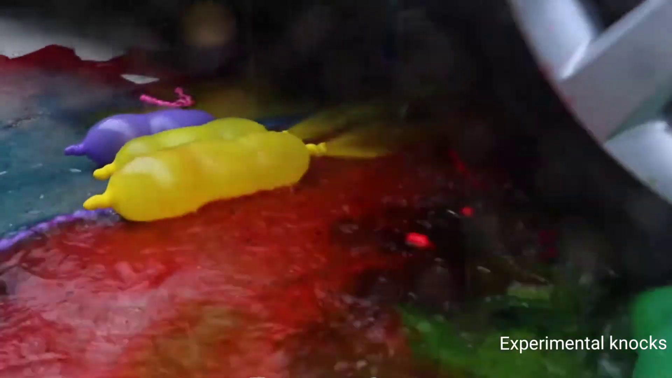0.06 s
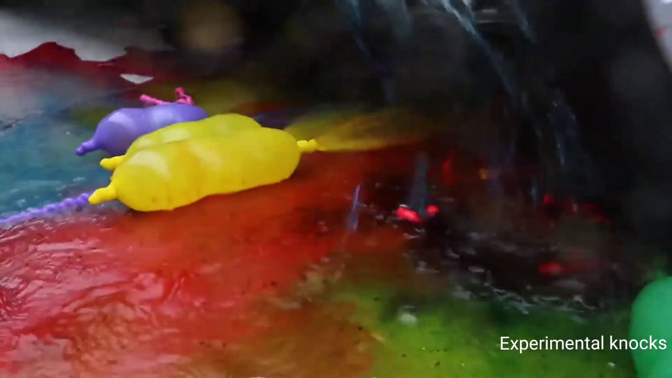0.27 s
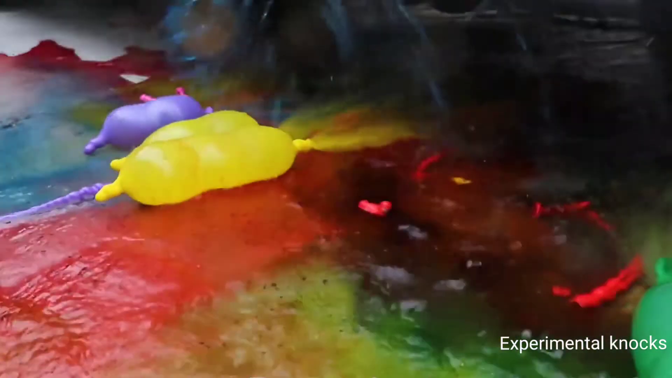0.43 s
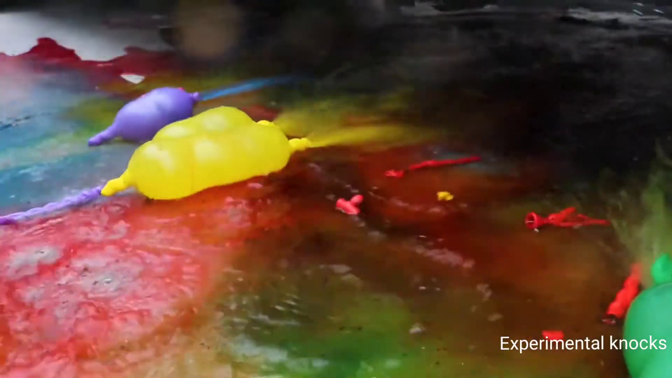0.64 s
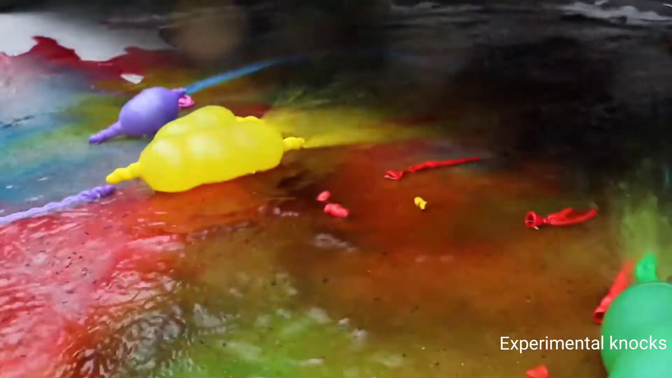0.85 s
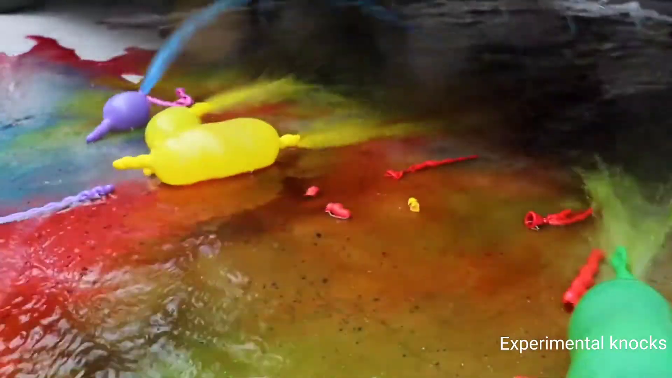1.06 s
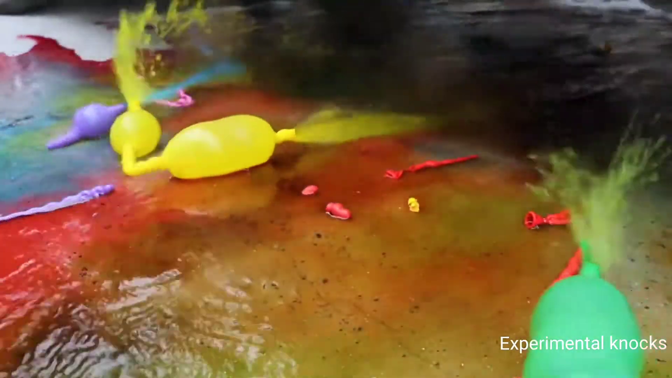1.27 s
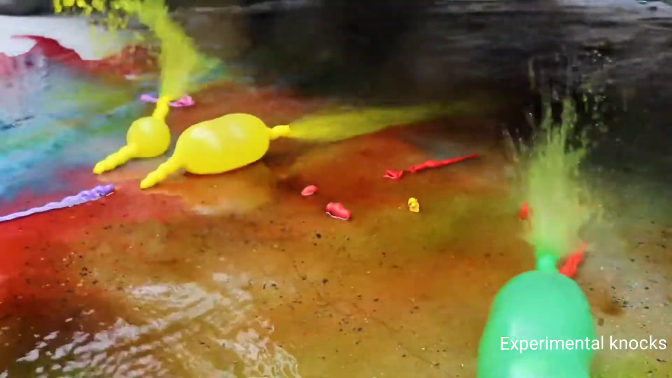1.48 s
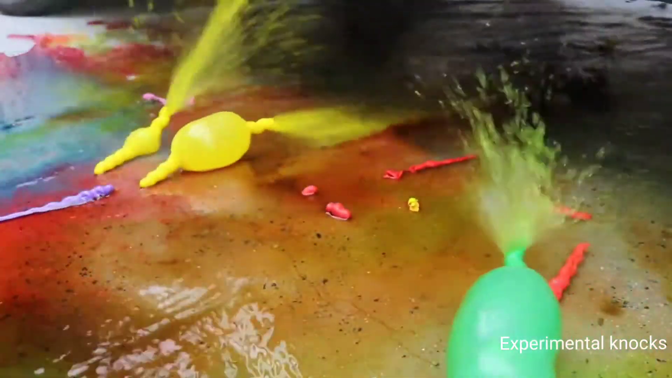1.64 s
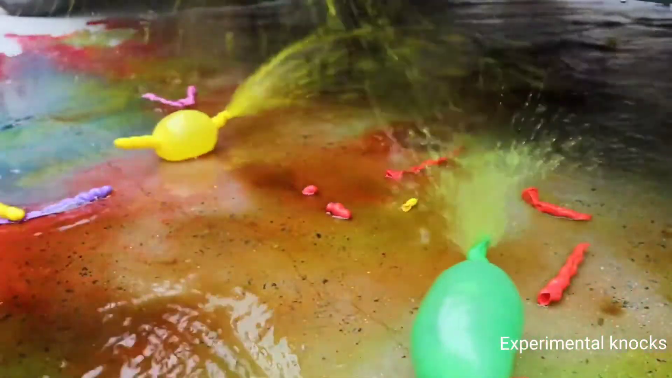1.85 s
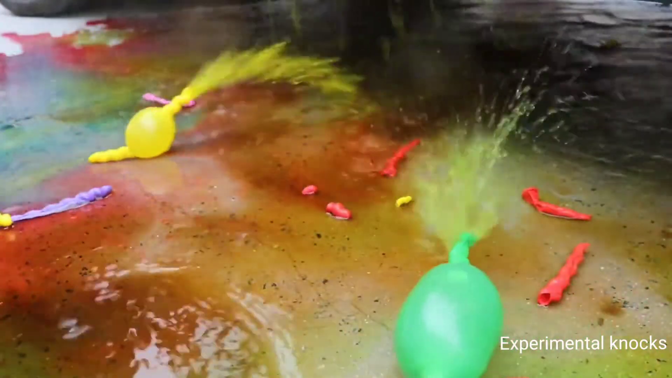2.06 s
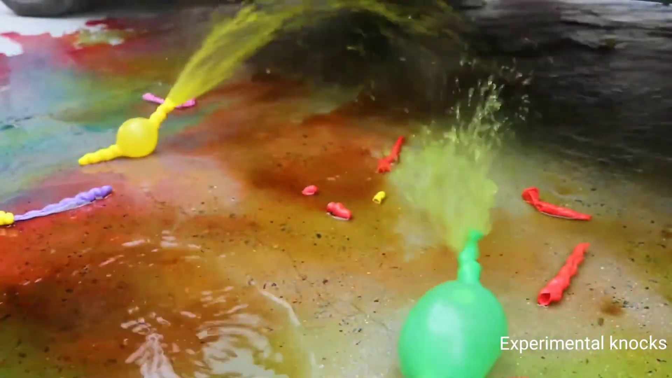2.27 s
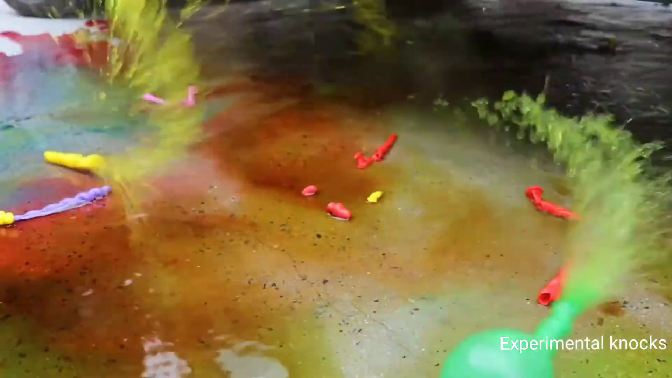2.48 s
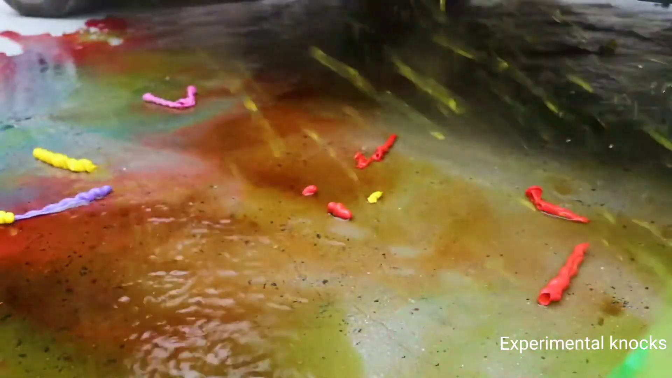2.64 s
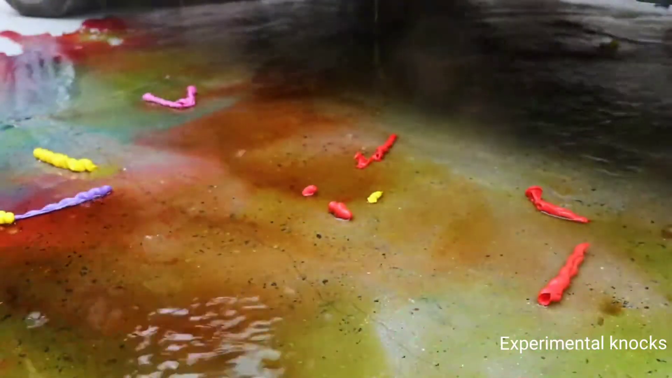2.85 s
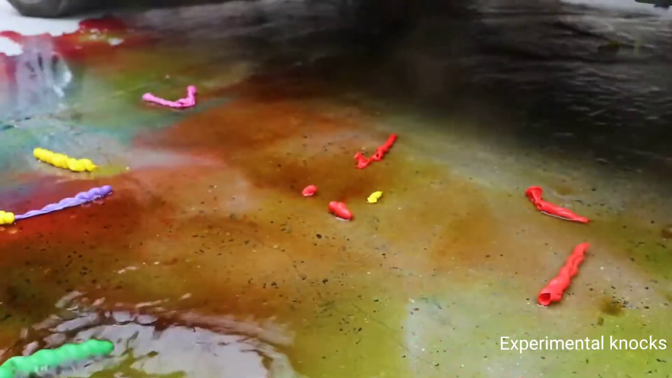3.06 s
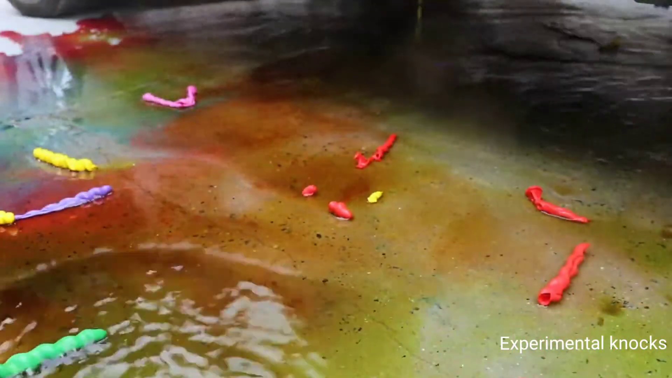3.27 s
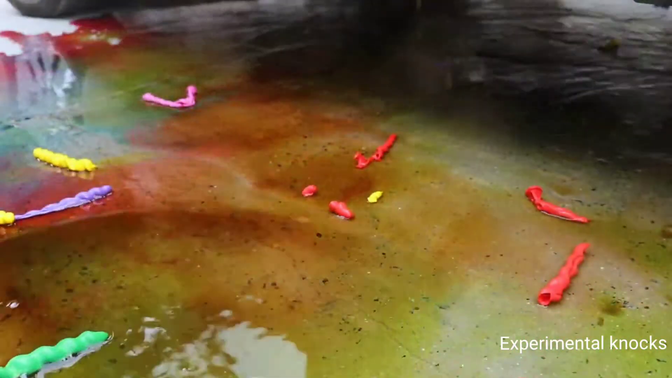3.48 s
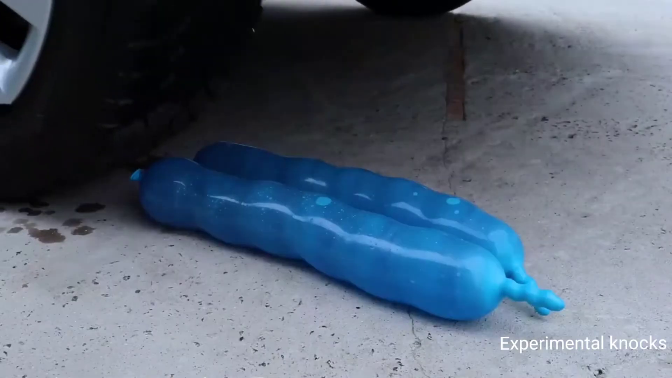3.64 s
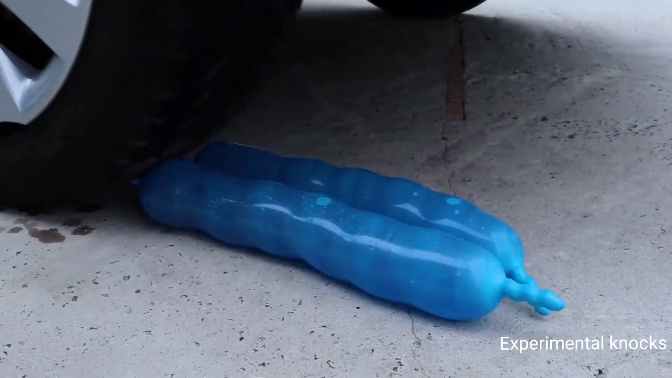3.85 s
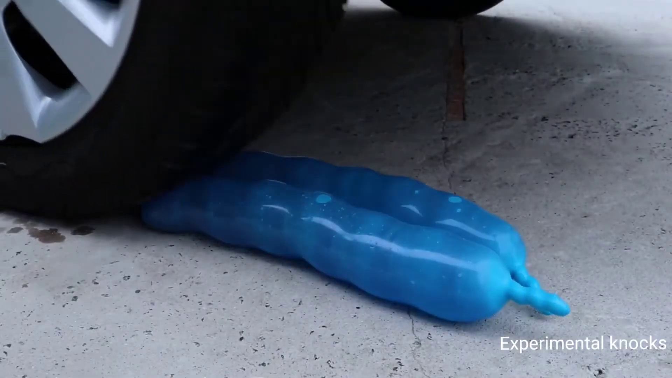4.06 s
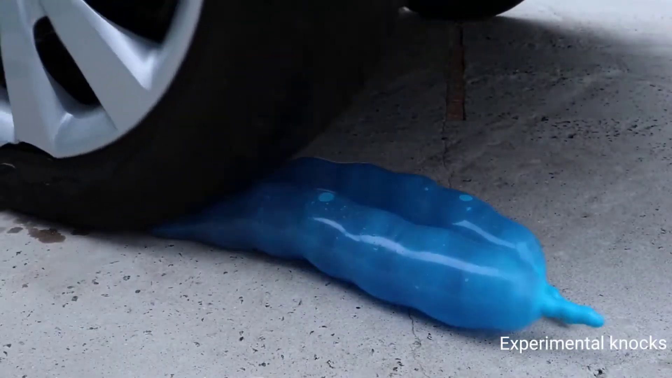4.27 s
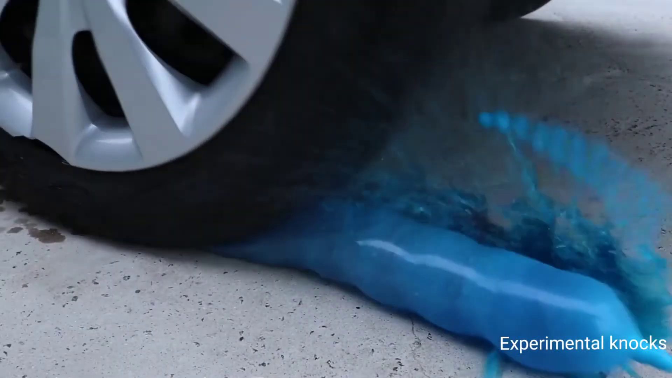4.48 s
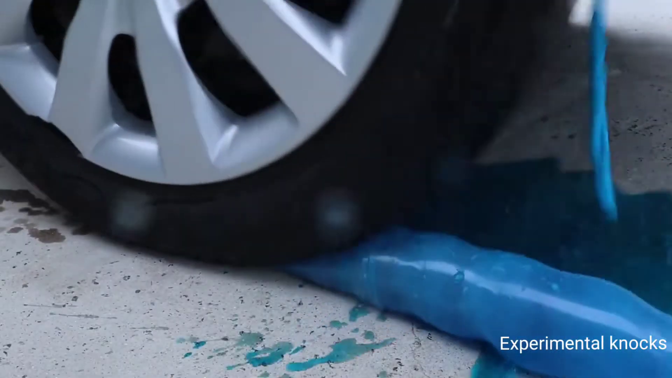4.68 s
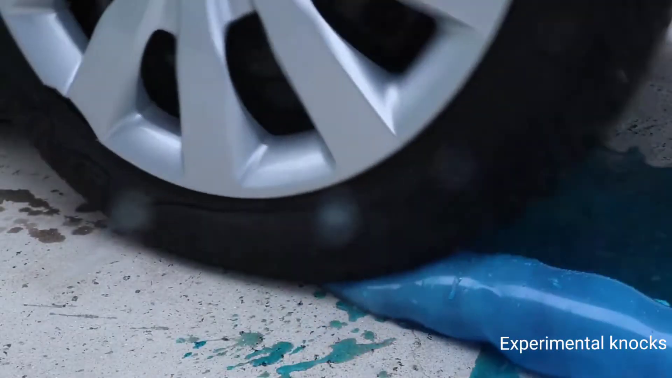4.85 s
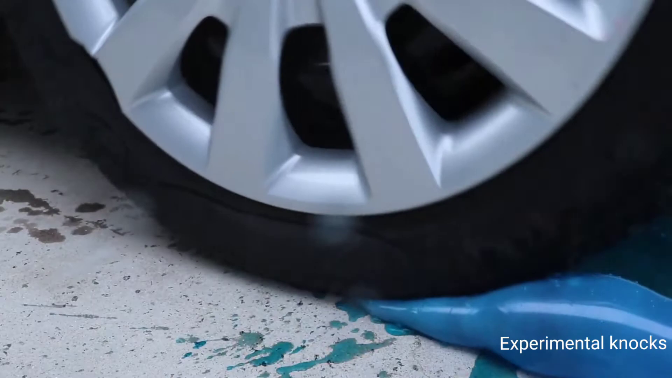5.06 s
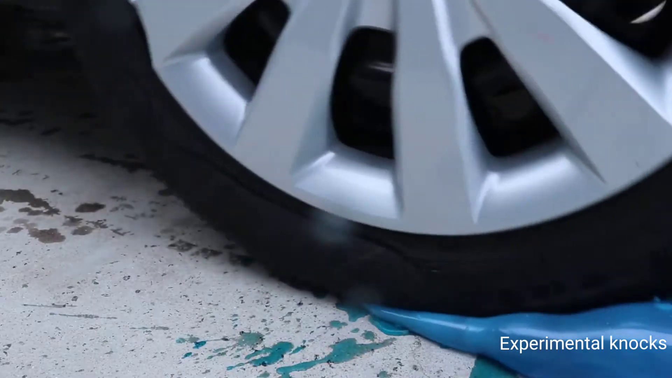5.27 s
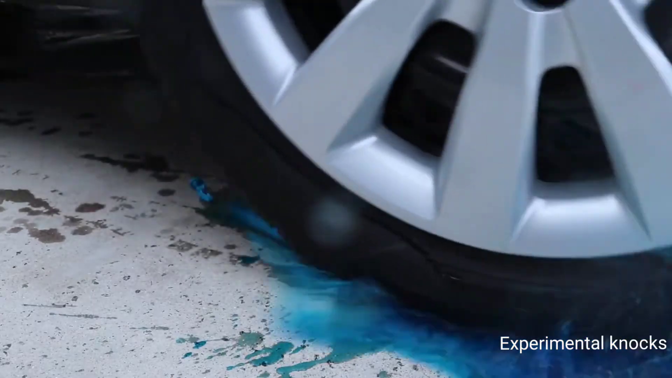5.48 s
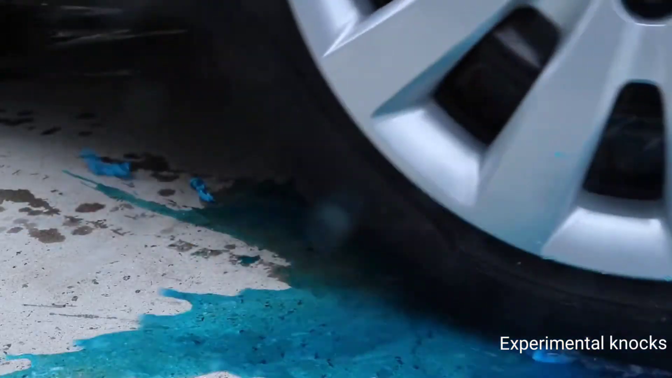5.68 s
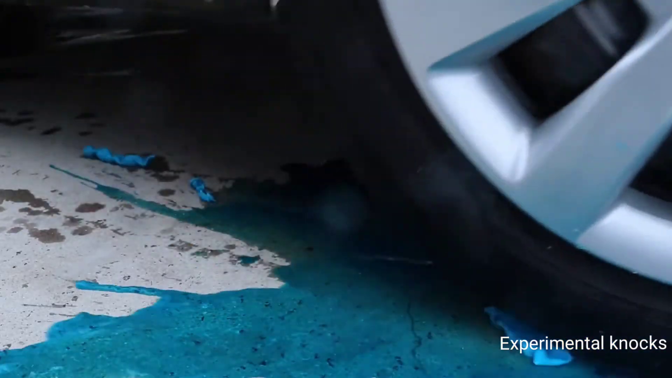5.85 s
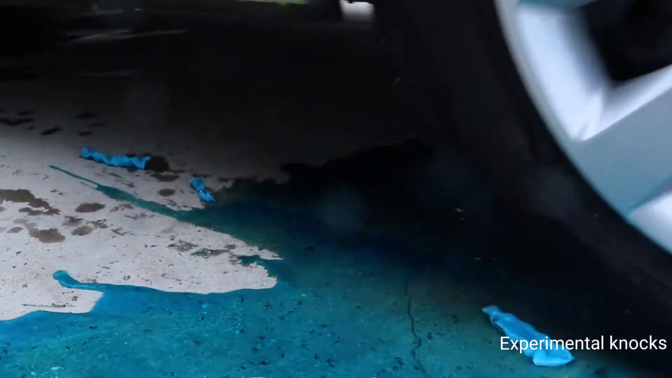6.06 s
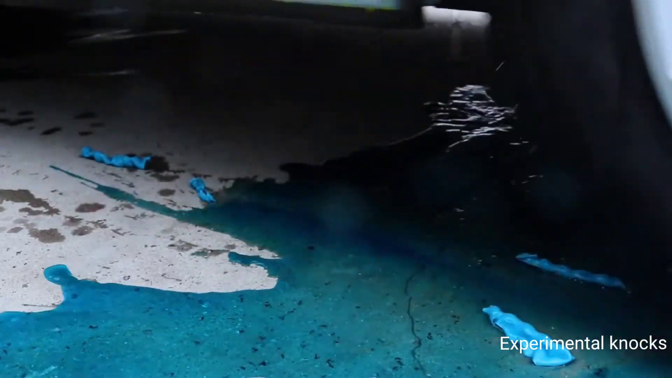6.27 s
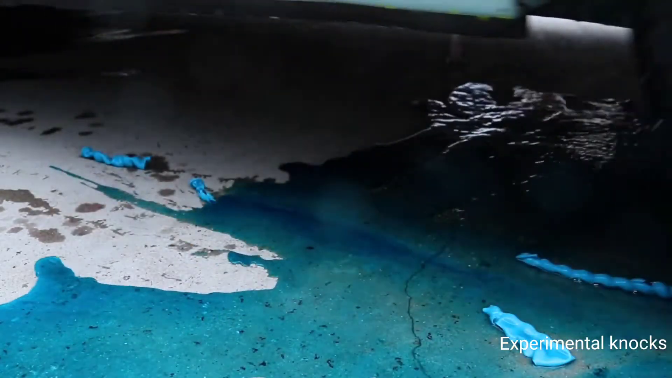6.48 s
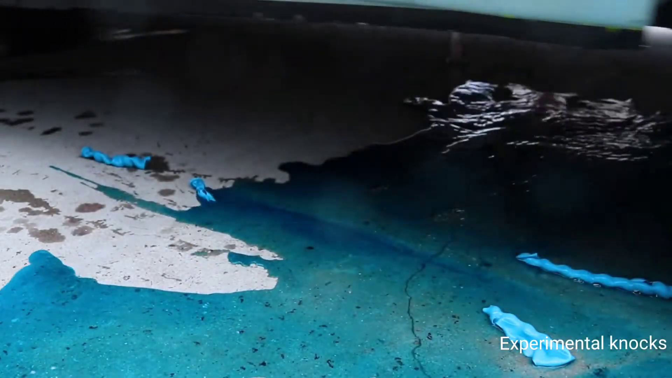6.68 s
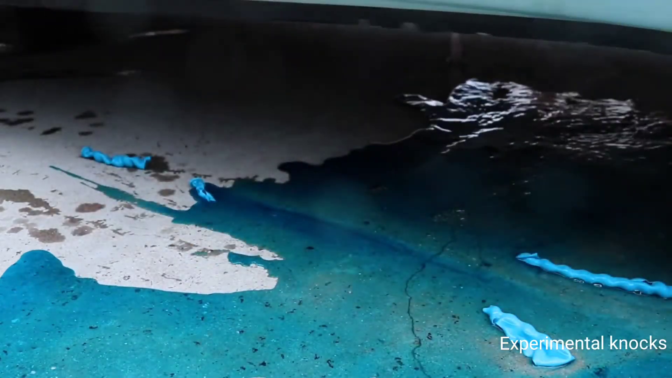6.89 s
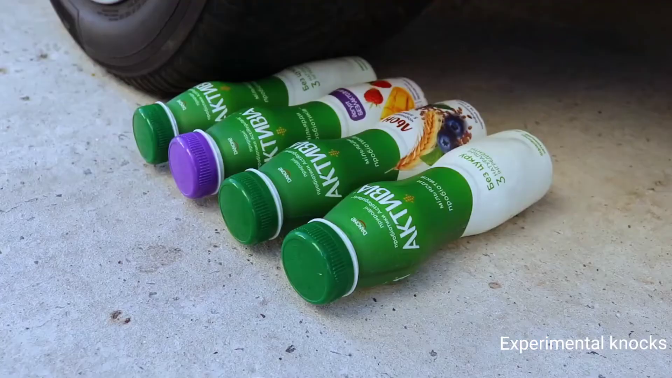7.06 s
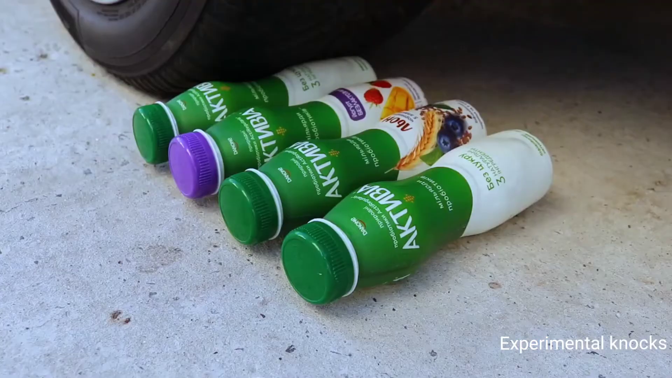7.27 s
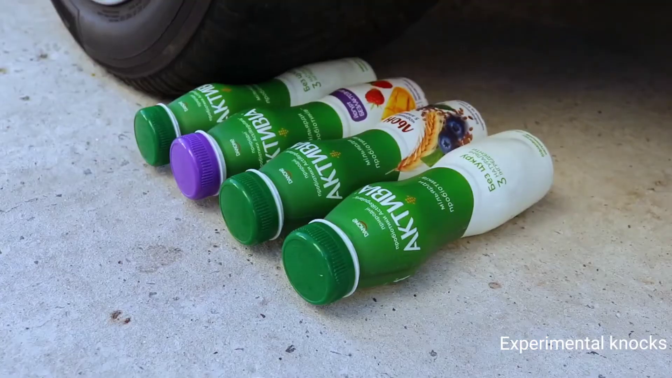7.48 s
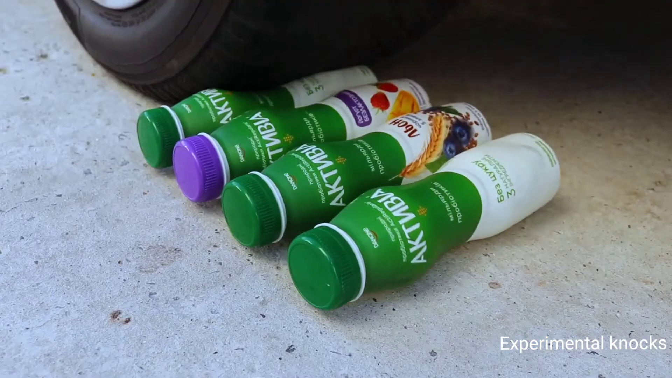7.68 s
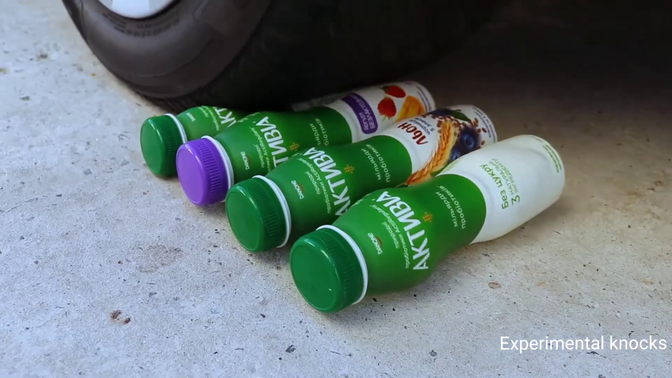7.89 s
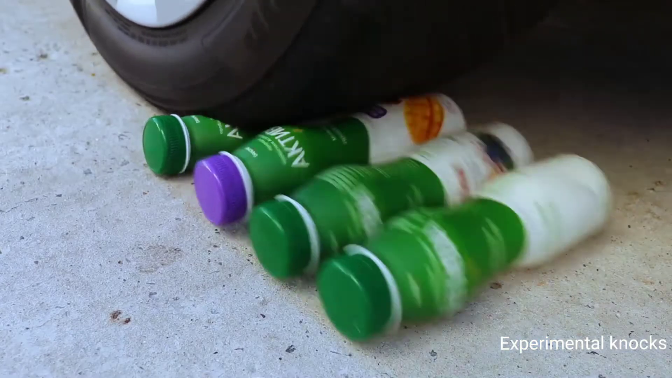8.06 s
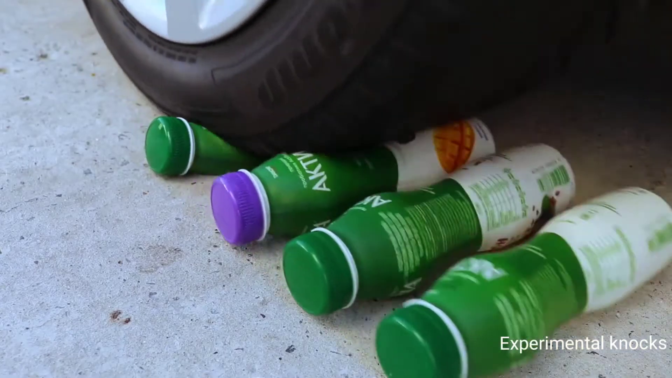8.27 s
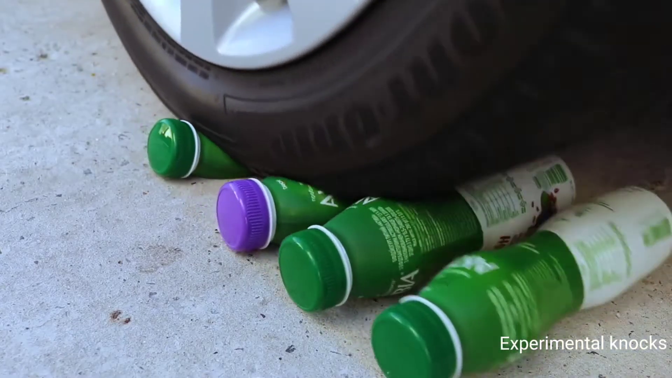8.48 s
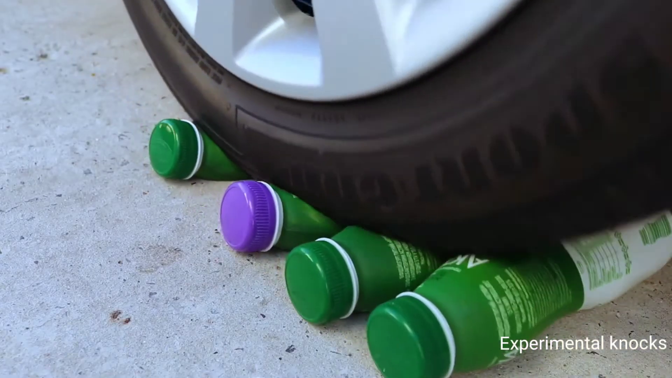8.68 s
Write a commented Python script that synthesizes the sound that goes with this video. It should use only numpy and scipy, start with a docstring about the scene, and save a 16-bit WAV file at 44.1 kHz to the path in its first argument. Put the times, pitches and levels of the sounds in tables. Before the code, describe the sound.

A close microphone outdoors beside a slowly rolling car wheel. Jets of water bubble and patter over a faint idle, fading to small drips. Then gliding high brake squeals, spitting water and gritty ticks accompany a sharp wet burst and a second, fuller, hollow one, followed by a thinning trickle and another squeal. Last, hollow plastic bottles crumple, cracking ever faster and louder with hissing contents until the abrupt end.

```python
"""A car creeps over things laid on concrete, close to the microphone, in three scenes, each over its own idling air.
First small water balloons squirt: ringing bubbles, drops and fluttering necks, with brief brake squeals.
Then water spits from under the tread, brakes sing as gliding tones, and two long balloons burst in torn noise
and ringing cavities. Last a row of plastic yoghurt bottles buckles in sharp panel snaps, crackles and hisses."""
import sys
import numpy as np
from scipy import signal
from scipy.fft import rfft, irfft, next_fast_len
from scipy.io import wavfile
from scipy.ndimage import uniform_filter1d, map_coordinates

SR = 44100
rng = np.random.default_rng(int(sys.argv[2]) if len(sys.argv) > 2 else 0)


def output_pcm(signal):
    """Save a mono or channel-first signal as 16-bit PCM at the path in sys.argv[1].

    Samples are clipped to [-1, 1] before scaling.
    """
    pcm = np.clip(np.atleast_2d(signal).T, -1, 1) * 32767
    wavfile.write(sys.argv[1], SR, np.round(pcm).astype(np.int16))


N = 384993

# water running out under the tread: time_s, flow_db (relative)
SPILL_FLOW = [(3.62, -79.5), (4.5, -65.5), (5.15, -54.5), (5.48, -63), (5.7, -59.5), (6, -64.5), (7.1, -73)]
# colour of water splashing: freq_hz, density_db (per Hz, relative)
SPLASH_SPECTRUM = [(60, -44.5), (250, -21.5), (450, -9.5), (700, -11.5), (1400, -7.5), (2200, -8),
                   (3500, -14.5), (8000, -29.5)]
# pressure of the tyre on the bottles, as a relative hiss level: time_s, level_db
BOTTLE_PRESSURE = [(7.58, -68), (7.78, -54.5), (7.93, -46.5), (8.27, -44), (8.44, -35.5), (8.73, -36)]
# bottle walls snapping through: start_s, panel_hz, panel_db, crack_db (relative)
WALL_SNAPS = [(7.71, 2130, -17.5, -31.5), (7.7115, 920, -14.5, -48), (7.763, 2850, -29.5, -48),
              (7.817, 830, -9, -38), (7.8517, 2210, -19.5, -47), (7.8532, 1430, -10.5, -51),
              (7.883, 920, -20, -45), (7.898, 730, -23.5, -38), (7.9099, 1550, -15.5, -48),
              (7.922, 1320, -25, -41), (7.9544, 2320, -43, -30.5), (7.9654, 1060, -24.5, -45),
              (8.0463, 1260, -14, -56), (8.0574, 1340, -16, -38), (8.0827, 1930, -25.5, -17.5),
              (8.0985, 2930, -22.5, -51), (8.2182, 940, -17.5, -53), (8.2553, 1960, -58, -24),
              (8.303, 1500, -18.5, -11.5), (8.3364, 850, -18, -24), (8.369, 1850, -28, -19),
              (8.3985, 2000, -23, -36), (8.4111, 890, -7.5, -15.5), (8.4418, 1740, -11.5, -35),
              (8.4556, 1140, -13, -44), (8.4761, 1350, -12, -45), (8.4846, 1380, -12.5, -48),
              (8.4911, 1240, -13, -48), (8.5222, 2720, -9, -15), (8.5953, 1600, -10.5, -34),
              (8.608, 2430, -16, -35), (8.6136, 2430, -10.5, -33), (8.624, 2140, -13, -44),
              (8.6352, 1000, -11.5, -36), (8.673, 2320, -19, -49), (8.68, 1030, -14.5, -47),
              (8.701, 1750, -12, -45)]
ROLLING_START_S, ROLLING_END_S = 3.75, 6.7  # the tyre rolls over wet concrete


def amp(db):
    """Decibels to gain."""
    return 10 ** (np.asarray(db) / 20)


def unit(x):
    """Scale to rms 1."""
    return x / np.sqrt(np.mean(x ** 2) + 1e-20)


def puff(x):
    """Give a short sound the energy of two milliseconds at rms 1."""
    return x / np.sqrt(np.sum(x ** 2) / (.002 * SR))


def along(points, hz):
    """Interpolate (Hz, value) points on a log frequency axis."""
    f, v = np.transpose(points)
    return np.interp(np.log(hz + 1), np.log(f + 1), v)


def curves(rows):
    """One value per sample for each column after the time."""
    s, *cols = np.transpose(rows)
    return [np.interp(np.arange(N) / SR, s, c) for c in cols]


def during(start_s, end_s):
    """A gate with soft edges."""
    t = np.arange(N) / SR
    return uniform_filter1d(((t >= start_s) & (t < end_s)) * 1., size=256)


def swell(s, length_s, edge_s):
    """An envelope that rises, holds and falls; a short one is a single arch."""
    edge_s = min(edge_s, length_s / 2)
    t = np.arange(int(length_s * SR)) / SR
    to_nearest_end_s = np.minimum(t, length_s - t)
    arch = np.sin(np.pi / 2 * np.minimum(to_nearest_end_s / edge_s, 1)) ** 2
    out = np.zeros(N)
    add(out, s, arch[max(-round(s * SR), 0):])  # drop what lies before time 0
    return out


def surges(rows):
    """Gains of a dull and a bright layer under a table of arched surges."""
    return sum(amp([[dull_db], [bright_db]]) * swell(s, length_s, length_s)
               for s, length_s, dull_db, bright_db in rows)


def wobble(rate_hz):
    """A smooth random curve, rate_hz knots a second."""
    steps = np.arange(0, N + 32, 32)
    knots = rng.standard_normal(int(N * rate_hz / SR) + 4)
    slow = map_coordinates(knots, [steps * rate_hz / SR])
    return np.interp(np.arange(N), steps, slow)


def filtered(x, response):
    """Multiply the spectrum of x by a response of frequency."""
    m = next_fast_len(len(x) + 8192)
    return irfft(rfft(x, m) * response(np.fft.rfftfreq(m, 1 / SR)), m)[:len(x)]


def highpass(x, corner_hz):
    """Small radiators give off little bass."""
    return signal.sosfilt(signal.butter(2, corner_hz, "high", fs=SR, output="sos"), x)


def coloured(x, spectrum):
    """x given a spectrum, at rms 1."""
    return unit(filtered(x, lambda hz: amp(along(spectrum, hz))))


def noise(spectrum, size=N):
    """Coloured noise of rms 1."""
    return coloured(rng.standard_normal(size), spectrum)


def band(centre_hz, q, size):
    """Noise in one resonance, rms 1."""
    def resonance(f):
        damping = 1j * f * centre_hz / q
        return 1j * f / (centre_hz ** 2 - f * f + damping)
    return unit(filtered(rng.standard_normal(size), resonance))


def fade(t, t60_s):
    """Exponential decay, 60 dB in t60_s."""
    return amp(-60 * t / t60_s)


def add(track, s, sound):
    """Mix a sound in at time s."""
    i = max(round(s * SR), 0)
    track[i:i + len(sound)] += sound[:max(N - i, 0)]


def drops(rows, rate_hz, centre_hz, cycles, spread_db, rise, size):
    """A random shower of damped little rings for as long as a curve lasts; rise bends their pitch up."""
    first_s, last_s = rows[0][0], rows[-1][0]
    chance = rng.random((int(rate_hz * (last_s - first_s)), 4))
    start = (SR * np.maximum(first_s + (last_s - first_s) * chance[:, :1], 0)).astype(int)
    hz = centre_hz * 3 ** (chance[:, 1:2] - chance[:, 2:3])
    strength = amp(-spread_db * np.log(chance[:, 3:] + .02))  # few strong, many weak
    k = np.arange(size)
    turns = hz * k / SR
    life = np.exp(-turns / cycles)
    rings = strength * life * np.sin(2 * np.pi * turns * (1 + rise * (1 - life)))
    return np.bincount((start + k).ravel(), rings.ravel(), minlength=N)[:N]


def shower(rows, grains, share, spectrum):
    """Grains on a smooth rush of the same colour, rms 1 while the curve lasts."""
    gate = during(rows[0][0], rows[-1][0])
    mix = share * unit(grains) + unit(gate * rng.standard_normal(N))
    return coloured(mix, spectrum) * np.sqrt(gate.mean())


def air():
    """Each scene has its own noise bed of idling engine and outdoor air; the second carries a thin whine."""
    # scene borders: first_s, second_s
    first_s, second_s = (3.605, 7.125)
    # bed colours: freq_hz, density_db (per Hz, relative)
    puddle_spectrum = [(15, -41), (25, -11), (64, 0), (140, -9.5), (253, -2.5), (359, -8), (919, -5),
                       (2700, -16.5), (3440, -55), (8580, -26), (15500, -25)]
    balloon_spectrum = [(15, -44), (25, -10), (96, 4.5), (160, 1.5), (204, 2), (469, -1), (552, -3.5),
                        (1110, -5.5), (1240, -5.5), (3170, -22), (9810, -18.5), (10600, -24.5),
                        (15500, -18.5)]
    bottle_spectrum = [(15, -26), (25, -11), (79, -14.5), (183, -10.5), (209, -15), (359, -9), (399, -12),
                       (582, -18.5), (703, -5.5), (919, -13), (1080, -6.5), (1380, -19), (15500, -41)]
    puddle_bass = noise([(25, -30), (85, -1.5), (160, -6.5), (500, -15), (2000, -62)])
    puddle = amp(-60.5) * noise(puddle_spectrum) + amp(-66.5) * puddle_bass
    whine = band(10000, q=300, size=N)
    balloons = amp(-66) * noise(balloon_spectrum) + amp(-82.5) * whine
    bottles = amp(-64) * noise(bottle_spectrum)
    return puddle * during(0, first_s) + balloons * during(first_s, second_s) + bottles * during(second_s, N / SR)


def water(rows, splash_db, bubble_share, drop_share, chirp_db, flutter_db):
    """Bubbles ring in the puddle, fine drops tick on concrete, a few drips chirp; all follow flow and surges."""
    # a balloon empties or the tyre squeezes a pool: start_s, length_s, splash_db, patter_db (relative)
    gushes = [(-.1, 0.24, -37, -51), (.05, 0.48, -38, -66), (.55, 0.12, -46, -77), (1.49, .15, -69, -58),
              (1.76, .19, -58, -47), (2.53, 0.14, -59, -55), (2.86, .13, -75, -43), (4.53, 0.11, -43, -36),
              (5.31, 0.13, -47.5, -90), (5.54, 0.23, -41.5, -55)]
    # colour of fine drops: freq_hz, density_db (per Hz, relative)
    patter_spectrum = [(500, -30.5), (1500, -10.5), (2600, -7), (4800, -2.5), (6700, -3), (8500, 1.5),
                       (10500, -7.5), (13500, -7.5), (16000, -16.5)]
    flow_db, = curves(rows)
    gush_splash, gush_patter = surges(gushes)
    bubbles = drops(rows, rate_hz=450, centre_hz=1600, cycles=4, spread_db=3.6, rise=.06, size=640)
    ticks = drops(rows, rate_hz=1000, centre_hz=4500, cycles=3, spread_db=4, rise=.05, size=128)
    drips = drops(rows, rate_hz=55, centre_hz=3400, cycles=17, spread_db=3.8, rise=.08, size=1500)
    splash_gain = amp(flow_db + splash_db) + gush_splash
    splash = splash_gain * shower(rows, bubbles, bubble_share, SPLASH_SPECTRUM)
    fine = shower(rows, ticks, drop_share, patter_spectrum) + amp(chirp_db) * drips
    patter = (amp(flow_db) + gush_patter) * fine
    return (splash + patter) * amp(flutter_db * wobble(45) + .7 * wobble(12))


def spray():
    """Jets from the small balloons fall on wet concrete: mostly drop patter, less bubble splash."""
    # flow of the jets: time_s, flow_db (relative)
    jet_flow = [(0, -44.5), (.5, -38.5), (1.35, -46.5), (1.6, -42.5), (2.3, -47.5), (2.95, -47),
                (3.02, -53.5), (3.2, -50.5), (3.29, -66), (3.6, -68)]
    return amp(-1.8) * water(jet_flow, splash_db=-12, bubble_share=.7, drop_share=1.1,
                             chirp_db=-4.5, flutter_db=1.1)


def catch(s, length_s):
    """The envelope of one squeal, growing out of a faint singing and sinking back into it."""
    edge_s, halo_s, halo_db = 0.069, 0.16, -24.5  # halo: time before and after, relative level
    halo_length_s = length_s + 2 * halo_s
    return swell(s, length_s, edge_s) + amp(halo_db) * swell(s - halo_s, halo_length_s, halo_length_s)


def brakes():
    """Pads drag on the disc and make it sing in one of two modes, swelling each time they catch."""
    # pads catching: start_s, length_s, pitch_hz, level_db
    squeals = [(0.126, 0.16, 11590, -41.5), (.49, .15, 11640, -51), (3.851, 0.17, 7990, -39.5),
               (3.978, 0.3, 8005, -45), (4.23, 0.14, 8130, -51.5), (4.331, 0.2, 8060, -45.5),
               (4.594, .25, 8075, -54), (4.816, 0.18, 8015, -52), (5.026, 0.1, 11620, -39),
               (5.092, 0.14, 11590, -28.5), (5.224, 0.16, 11590, -62), (6.056, 0.16, 11600, -46),
               (6.233, 0.25, 11580, -38)]
    mode_split_hz = 10000
    out = np.zeros(N)
    for upper in (False, True):
        rows = [row for row in squeals if (row[2] > mode_split_hz) == upper]
        grip = sum(amp(db) * catch(s, length_s) for s, length_s, hz, db in rows)
        glide_hz, = curves([(s + length_s / 2, hz) for s, length_s, hz, db in rows])
        pitch_hz = glide_hz + 7 * wobble(6.4) + 5 * wobble(70)
        out += grip * np.sqrt(2) * np.sin(2 * np.pi * np.cumsum(pitch_hz) / SR)
    return out * amp(1.0 * wobble(32))


def stray_ticks(rows, count):
    """Lesser ticks at random moments, as strong as the flow allows."""
    over_flow_db, scatter_db, typical_hz = 13, 2.5, 2295
    s, flow_db = np.transpose(rows)
    times_s = rng.uniform(s[0], s[-1], count)
    chance = rng.standard_normal((count, 2))
    levels_db = np.interp(times_s, s, flow_db) + over_flow_db + scatter_db * chance[:, 0]
    return list(zip(times_s, levels_db, typical_hz * 2 ** (.5 * chance[:, 1])))


def wet_ticks():
    """Rubber flicks and water slaps: short noise puffs in a resonance; the higher ones crack more."""
    # ticks and slaps: start_s, level_db (relative), centre_hz
    ticks = [(.046, -19, 1670), (.178, -22, 1670), (0.327, -32, 1070), (.454, -25, 1800),
             (1.552, -28.5, 3500), (1.82, -24, 6900), (2.283, -28.5, 3360), (2.887, -22.5, 5260),
             (2.909, -26.5, 2000), (2.944, -24.5, 2340), (3.101, -27.5, 2550), (3.111, -29.5, 2590),
             (3.157, -26, 2200), (3.209, -20.5, 2540), (3.453, -35.5, 930), (3.93, -59, 7000),
             (4.572, -20, 2020), (4.816, -32, 2350), (4.933, -28, 2270), (5.042, -30, 2540),
             (5.0648, -18.5, 1750), (5.154, -20, 2390), (5.265, -23, 3040), (5.275, -28, 2240),
             (5.322, -39, 2250), (5.529, -31.5, 1770), (5.966, -28.5, 3840), (6.135, -34.5, 1268),
             (6.546, -34, 1460)]
    # colour of the crack: freq_hz, density_db (per Hz, relative)
    slap_spectrum = [(300, -29.5), (1500, -6.5), (3500, -3.5), (6000, -2.5), (9000, -3), (11000, -11),
                     (16000, -15)]
    out, t = np.zeros(N), np.arange(SR // 16) / SR
    for s, db, hz in ticks + stray_ticks(SPILL_FLOW, count=20):
        decay = fade(t, 0.014) + amp(-9.5) * fade(t, 0.12)
        slap = puff(band(hz, q=7.3, size=len(t)) * decay)
        crack_gain = amp(-5) * min(hz / 2800, 1)
        crack = crack_gain * puff(noise(slap_spectrum, size=len(t)) * fade(t, .007))
        add(out, s, amp(db - 8) * (slap + crack))
    return out


def underbody(x):
    """Sound echoes briefly between concrete and car floor: convolution with a decaying noise tail."""
    # colour of the tail: freq_hz, level_db (relative)
    tail_spectrum = [(60, -16.5), (250, -1), (450, -3.5), (800, -4.5), (1500, -3), (3000, -3.5), (8000, 1),
                     (16000, -14)]
    # its decay: freq_hz, t60_s
    tail_decay = [(200, 0.46), (1500, 0.2), (10000, 0.088)]
    hz, t, z = signal.stft(rng.standard_normal(SR // 3), SR, nperseg=256)
    colour = amp(along(tail_spectrum, hz))[:, None]
    decay = fade(t, along(tail_decay, hz)[:, None])
    tail = signal.istft(z * colour * decay, SR, nperseg=256)[1]
    delayed = np.pad(tail / np.linalg.norm(tail), (128, 0))
    return signal.fftconvolve(x, delayed)[:N]


def gurgle():
    """A slack neck flutters in the jet as its balloon empties: bursts of low resonant noise."""
    # necks blurting: start_s, length_s, flutter_hz, level_db
    blurts = [(0.265, 0.15, 450, -53), (0.602, 0.1, 175, -56.5), (1.677, 0.12, 385, -51),
              (1.802, 0.1, 348, -51.5), (4.685, 0.092, 256, -53)]
    out = np.zeros(N)
    for s, length_s, hz, db in blurts:
        size = int(length_s * SR)
        buzz = band(hz, q=2.6, size=size)
        flutter = unit(filtered(buzz, lambda f: 1 / (1 + (f / (2.9 * hz)) ** 4)))
        add(out, s, amp(db) * flutter * signal.windows.tukey(size, .5))
    return out


def plops():
    """Each larger bubble is a decaying sine that rises in pitch as it nears the surface."""
    # single bubbles: start_s, level_db (relative), start_hz
    bubbles = [(.275, -22, 2270), (.429, -26.5, 680), (.607, -23.5, 1770), (1.513, -27, 1320),
               (1.596, -21.5, 1365), (2.307, -28, 2650), (2.571, -26, 1770), (2.961, -24, 1330),
               (4.591, -19, 1460), (4.754, -28, 1110), (5.61, -15, 1310), (5.686, -30, 1140),
               (5.859, -28.5, 1274)]
    out, t = np.zeros(N), np.arange(SR // 16) / SR
    envelope = fade(t, 0.045) * (1 - np.exp(-t / 0.00093))
    for s, db, hz in bubbles:
        add(out, s, amp(db - 9) * np.sin(2 * np.pi * hz * t * (1 + 3.2 * t)) * envelope)
    return out


def bump():
    """Soft dull noise knocks as the tyre leaves the puddle and mounts the balloons."""
    # knocks: start_s, level_db
    knocks = [(3.555, -47.5), (4.07, -61), (4.19, -61)]
    spectrum = [(40, -21), (120, 5), (650, -4), (1800, -29), (5000, -48)]
    out, t = np.zeros(N), np.arange(SR // 16) / SR
    for s, db in knocks:
        add(out, s, amp(db) * noise(spectrum, size=len(t)) * fade(t, 0.17))
    return out


def spill():
    """Water runs out under the tread: splash outweighs patter, with a deeper flutter."""
    return amp(-2) * water(SPILL_FLOW, splash_db=5.5, bubble_share=0.4, drop_share=0.87,
                           chirp_db=-7.5, flutter_db=1.9)


def drone():
    """Resonances of the car body swell as it strains over the balloons."""
    # body drones: start_s, length_s, centre_hz, q, level_db
    rows = [(3.7, 1.5, 408, 20, -72.5), (4.455, 0.86, 235, 12, -66), (5.401, .95, 234, 16, -65)]
    return sum(amp(db) * swell(s, length_s, edge_s=0.15) * band(hz, q=q, size=N)
               for s, length_s, hz, q, db in rows)


def spitting():
    """Water and air spit from under the tread in sharp little clicks that follow the flow."""
    flow_db, = curves(SPILL_FLOW)
    clicks = drops(SPILL_FLOW, rate_hz=70, centre_hz=3200, cycles=1.2, spread_db=4.5, rise=0, size=128)
    return amp(flow_db - 5.5) * unit(clicks) * during(ROLLING_START_S, ROLLING_END_S)


def grit():
    """Grains of sand tick under the rolling tread, and later hairline creases tick in the plastic."""
    buckling_start_s, buckling_end_s = 7.65, 8.73
    sand = drops(SPILL_FLOW, rate_hz=20, centre_hz=6500, cycles=.7, spread_db=4, rise=0, size=48)
    hairlines = drops(BOTTLE_PRESSURE, rate_hz=45, centre_hz=7000, cycles=1, spread_db=4, rise=0, size=48)
    rolling = amp(-50.5) * sand * during(ROLLING_START_S, ROLLING_END_S)
    return rolling + amp(-32) * hairlines * during(buckling_start_s, buckling_end_s)


def squeaks():
    """Wet rubber slips with a thin, jittering, falling note."""
    # squeaks: start_s, length_s, start_hz, end_hz, level_db (relative)
    slips = [(3.758, .13, 4550, 2910, -68), (6.27, 0.2, 4100, 3490, -58)]
    out = np.zeros(N)
    for s, length_s, start_hz, end_hz, db in slips:
        size = int(length_s * SR)
        jitter_hz = 260 * noise([(200, 0), (900, -50)], size=size)
        pitch_hz = np.linspace(start_hz, end_hz, size) + jitter_hz
        add(out, s, amp(db - 1) * np.hanning(size) * np.sin(2 * np.pi * np.cumsum(pitch_hz) / SR))
    return out


def bursts():
    """The skin rips, the opened cavity and the pocket under the tyre ring, and the water slaps down."""
    # start_s, tear_db, cavity_db, cavity_hz, cavity_t60_s, pocket_db, thud_db, splash_db (relative)
    balloon_bursts = [(4.5363, -10, -16.5, 820, 0.056, -32, -30, -45),
                      (4.537, -3, -12.5, 2600, 0.038, -36.5, -40, -41.5),
                      (5.559, -6.5, 4.5, 1590, 0.035, -11.5, -4, -32.5)]
    # colour of the rip: freq_hz, density_db (per Hz, relative)
    tear_spectrum = [(50, -27), (250, -6), (600, -6.5), (1500, -7), (4000, -7), (8000, 0), (10300, -11),
                     (13000, -5.5), (16000, -10.5)]
    # hollow between tyre and ground: mode_hz, level_db (relative), t60_s
    pocket_modes = [(240, -19.5, 0.11), (643, -6.5, .07), (824, -15, .06), (1380, 1.5, 0.043),
                    (1718, -4, .055), (2455, -1, 0.045)]
    thud_spectrum = [(25, 1), (70, 3.5), (250, 2.0), (700, -13), (1500, -31.5), (6000, -57)]
    lump_spectrum = [(80, -2.5), (400, -54), (2000, -89.5)]
    out, t = np.zeros(N), np.arange(SR // 2) / SR
    onset = 1 - np.exp(-t / 0.00036)
    for s, tear_db, cavity_db, hz, t60_s, pocket_db, thud_db, splash_db in balloon_bursts:
        tear_decay = fade(t, 0.015) + amp(-19.5) * fade(t, 0.098)
        tear = amp(tear_db) * noise(tear_spectrum, size=len(t)) * tear_decay
        cavity = amp(cavity_db) * band(hz, q=2.6, size=len(t)) * fade(t, t60_s)
        modes = sum(amp(db) * np.sin(2 * np.pi * f * t) * fade(t, life_s) for f, db, life_s in pocket_modes)
        pocket = amp(pocket_db) * modes
        thud = amp(thud_db) * noise(thud_spectrum, size=len(t)) * fade(t, 0.026)
        lumps = amp(1.5 * noise(lump_spectrum, size=len(t)))  # slow random level
        splash = amp(splash_db) * noise(SPLASH_SPECTRUM, size=len(t)) * lumps * fade(t, 0.47)
        add(out, s, (tear + cavity + pocket + thud + splash) * onset)
    return out


def crushing():
    """Creases crackle after every snap and contents hiss past the caps, both growing with the pressure."""
    # a bottle caves in: start_s, length_s, crumple_db, squirt_db (relative)
    collapses = [(7.61, 0.042, -42, -82), (8.07, .11, -43, -41), (8.59, .09, -49, -46)]
    # colours: freq_hz, density_db (per Hz, relative)
    crumple_spectrum = [(30, -26), (250, -2.5), (450, -14), (750, -0.5), (1400, 3.5), (2600, -5.5),
                        (5000, -23), (12000, -45)]
    squirt_spectrum = [(200, -53.5), (800, -24), (2600, 2.5), (5000, -1), (8500, 0.5), (10300, -10),
                       (13500, 0), (16000, -26.5)]
    crease_db, crease_t60_s = -15, 0.04  # crumpling set off by a snap, relative to its panel
    press_db, = curves(BOTTLE_PRESSURE)
    cave_in, spurt = surges(collapses)
    shed, t = np.zeros(N), np.arange(SR // 4) / SR
    for s, hz, panel_db, crack_db in WALL_SNAPS:
        add(shed, s, amp(panel_db + crease_db) * fade(t, crease_t60_s))
    creases = drops(BOTTLE_PRESSURE, rate_hz=250, centre_hz=1210, cycles=1.7, spread_db=6, rise=0, size=300)
    spits = drops(BOTTLE_PRESSURE, rate_hz=160, centre_hz=5700, cycles=1.1, spread_db=4, rise=0, size=64)
    crumple_gain = amp(press_db - 0.5) + cave_in + shed
    crumple = crumple_gain * shower(BOTTLE_PRESSURE, creases, 0.48, crumple_spectrum)
    squirt_gain = amp(press_db - 1.5) + spurt
    squirt = squirt_gain * shower(BOTTLE_PRESSURE, spits, 0.24, squirt_spectrum)
    return crumple + squirt


def settling():
    """Each snapped wall settles a moment later with a weaker snap at a nearby pitch."""
    delay_s, relative_db = 0.011, -17.5  # typical delay
    chance = rng.standard_normal((len(WALL_SNAPS), 2))
    return [(s + delay_s * 2 ** (.5 * late), hz * 2 ** (.5 * shift), panel_db + relative_db, crack_db + relative_db)
            for (s, hz, panel_db, crack_db), (late, shift) in zip(WALL_SNAPS, chance)]


def snaps():
    """A wall panel folds and flips with a crack, swings a few cycles and rings the hollow bottle."""
    # colours of crack and fold: freq_hz, density_db (per Hz, relative)
    crack_spectrum = [(150, -44), (600, -59), (2800, 0.5), (5000, -2), (8300, 4.5), (10300, -5.5),
                      (13500, -8), (16000, -2.5)]
    fold_spectrum = [(600, -17), (1800, 3.5), (3200, 2), (4200, -8), (6000, -29), (14000, -54)]
    fold_db, fold_t60_s = -8.5, 0.013  # sharp fold starting each snap, relative to the panel
    out, t = np.zeros(N), np.arange(SR // 16) / SR
    for s, hz, panel_db, crack_db in WALL_SNAPS + settling():
        swing = np.sin(2 * np.pi * hz * t) * fade(t, 12 / hz)
        flex = .55 * band(1.6 * hz, q=2.5, size=len(t)) * fade(t, .006)
        push = 0.15 * np.sin(2 * np.pi * 660 * t) * fade(t, 0.017)
        hollow = amp(-18) * band(830, q=7, size=len(t)) * fade(t, .055)
        panel = puff((swing + flex + push + hollow) * (1 - np.exp(-t / 0.00011)))
        crack_envelope = (fade(t, .004) + amp(-36) * fade(t, .04)) * (1 - np.exp(-t / .0003))
        crack = puff(noise(crack_spectrum, size=len(t)) * crack_envelope)
        fold = amp(fold_db) * puff(noise(fold_spectrum, size=len(t)) * fade(t, fold_t60_s))
        add(out, s, amp(panel_db) * (panel + fold) + amp(crack_db + 2) * crack)
    return highpass(out, corner_hz=290)


def scene():
    """All sources at the microphone; the short blows also echo under the car."""
    blows = wet_ticks() + plops() + spitting() + grit() + squeaks() + bursts() + snaps()
    echo = amp(-20) * underbody(blows)
    wet = spray() + gurgle() + spill()
    car = air() + brakes() + bump() + drone()
    return (blows + echo + wet + car + crushing())[None]


def record(dry):
    """The loudest peaks overload the recorder, which keeps nothing above its band limit."""
    ceiling, top_hz = .92, 15700
    clipped = dry[0] / (1 + np.abs(dry[0] / ceiling) ** 6) ** (1 / 6)
    return filtered(clipped, lambda hz: 1 / (1 + (hz / top_hz) ** 120))[None]


dry = scene()
out = record(dry)
output_pcm(out)
```